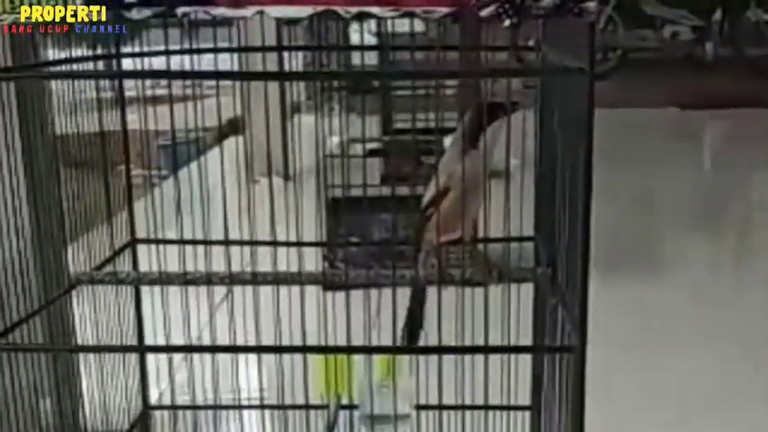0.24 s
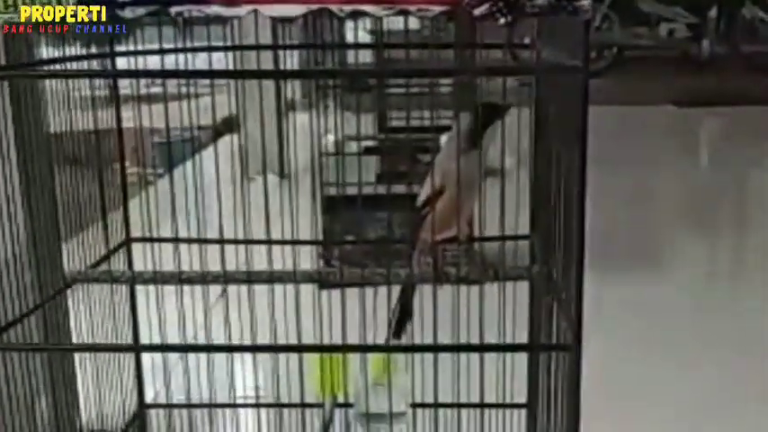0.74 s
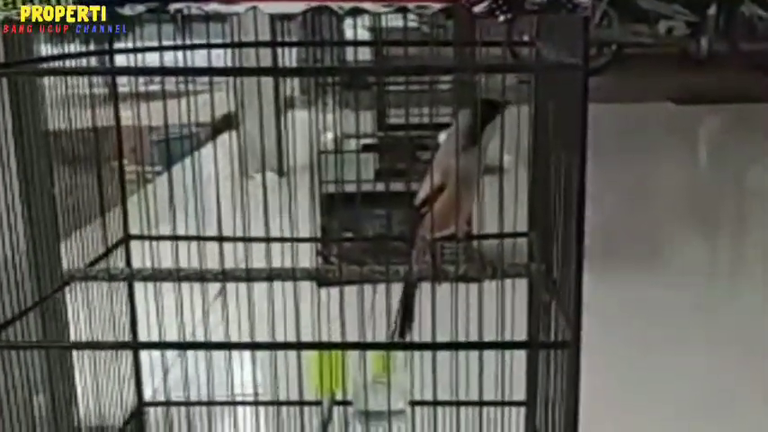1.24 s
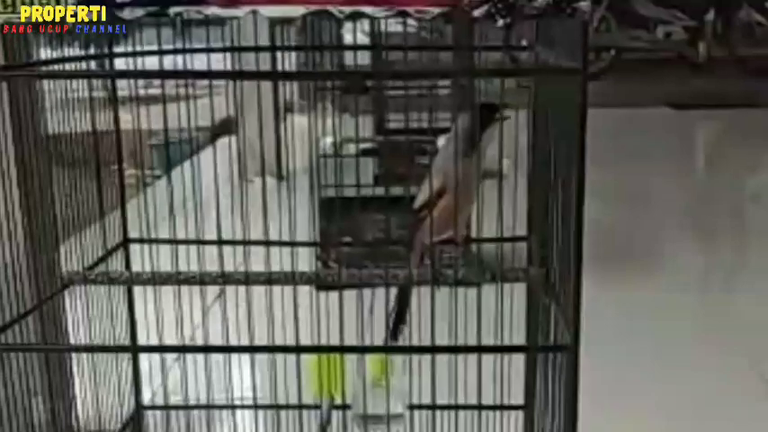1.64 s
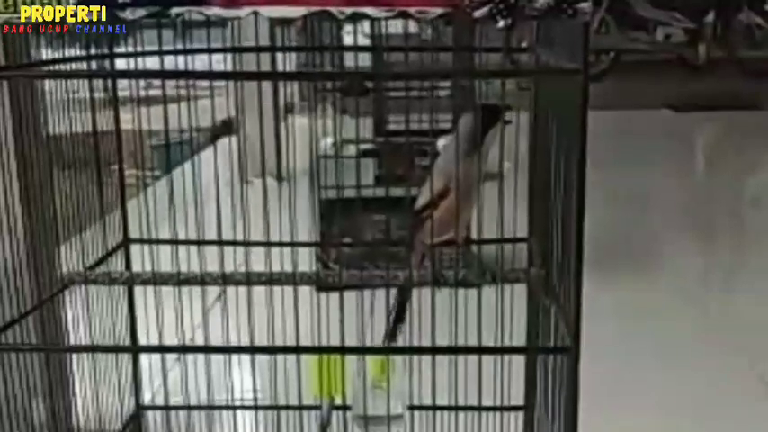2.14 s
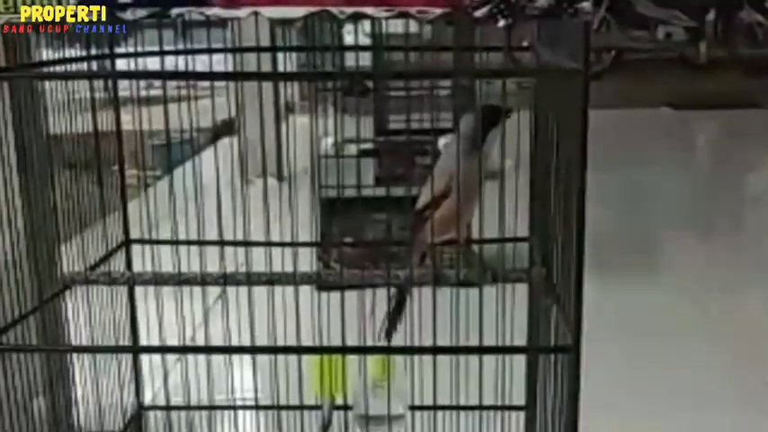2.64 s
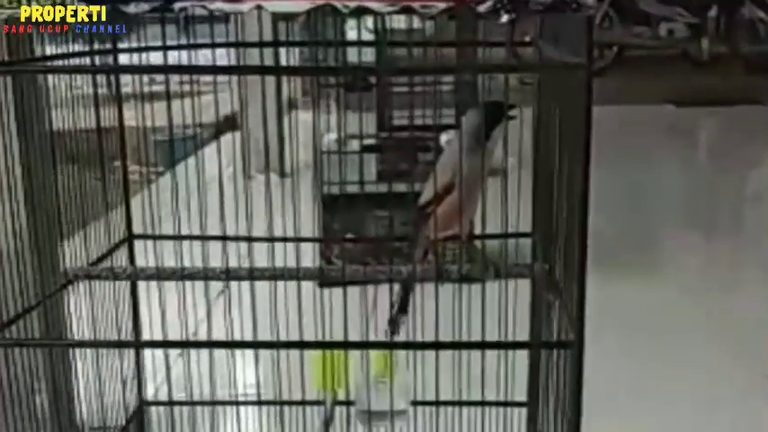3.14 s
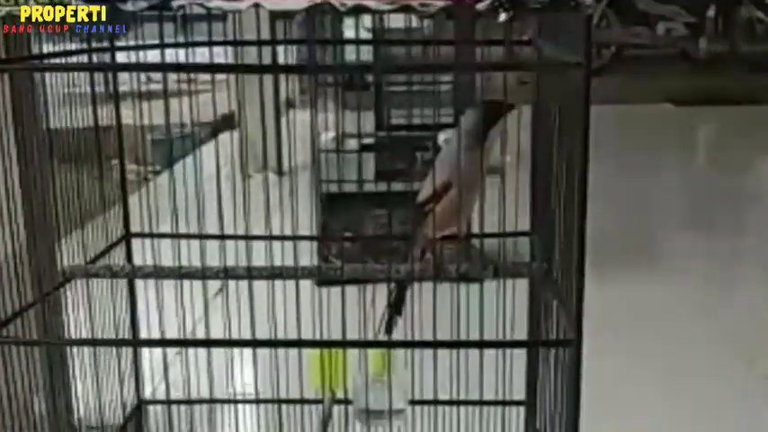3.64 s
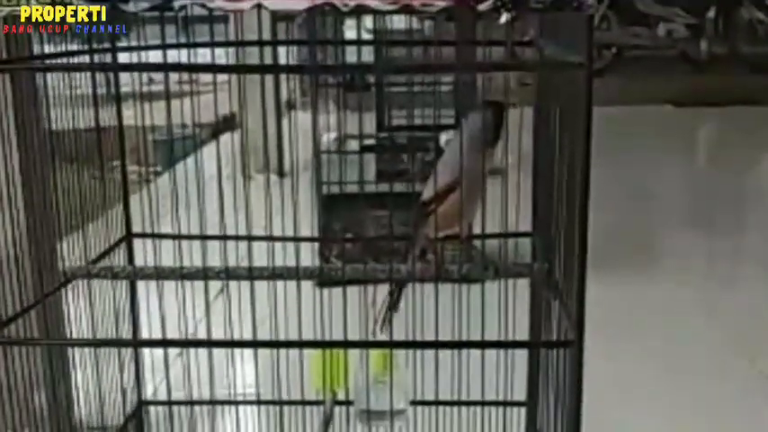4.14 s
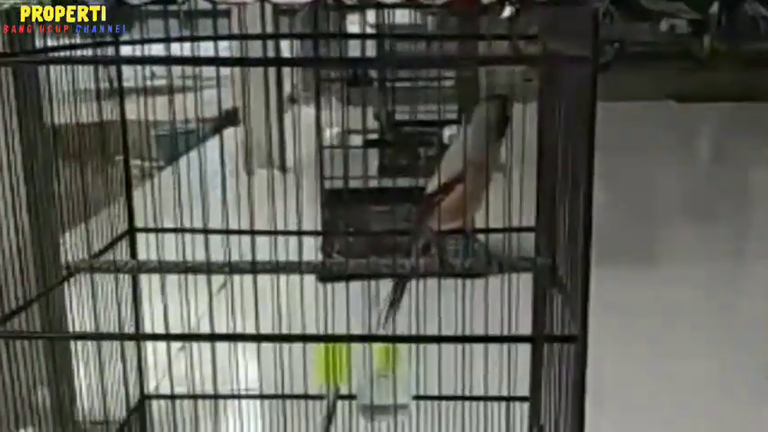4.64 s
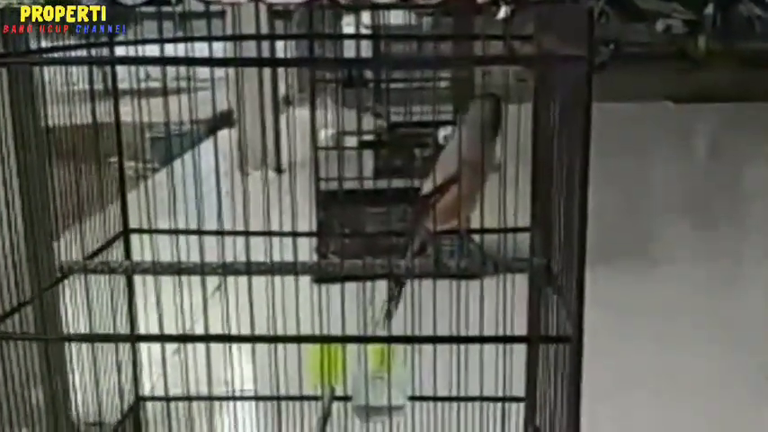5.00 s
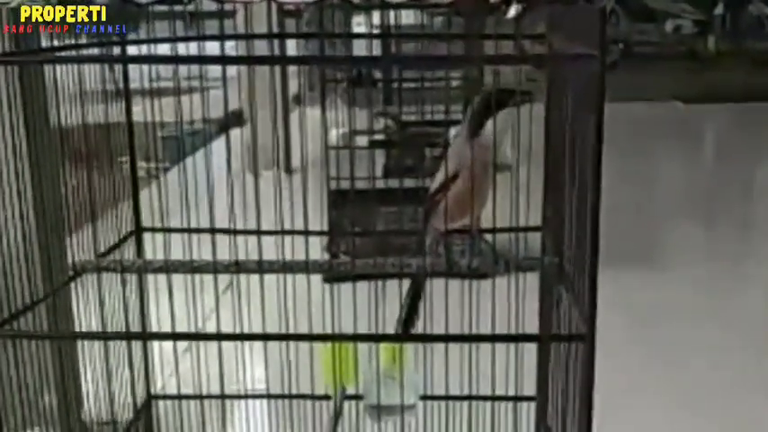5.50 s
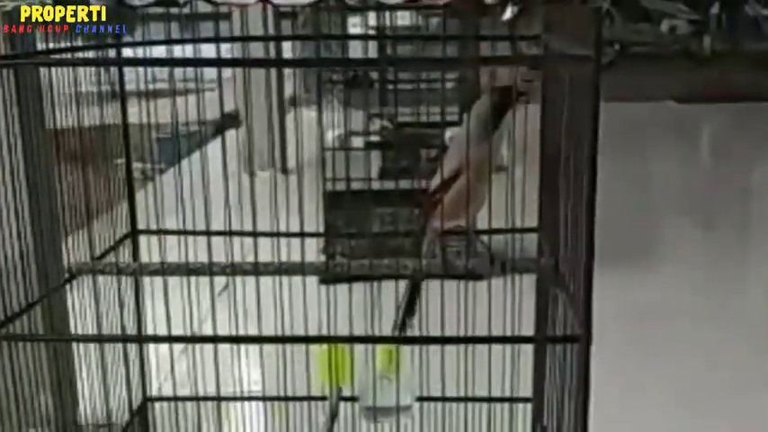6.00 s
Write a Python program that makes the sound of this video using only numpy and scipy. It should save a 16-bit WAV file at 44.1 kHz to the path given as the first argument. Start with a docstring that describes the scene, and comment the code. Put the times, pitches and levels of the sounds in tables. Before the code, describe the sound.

A caged shrike calls close by on a hard-walled porch, bright and forceful, with short diffuse stereo echoes. From 0 to 0.75 seconds it gives six harsh chacks, about seven a second. A short rasp at 0.9 leads into three rising sweeps until 1.35, then eleven quick upward chirps, evenly spaced, until 2.8. Around 3.05 come two brief lower held notes, a small rasp at 3.2, and sharp upward chips at 3.4 and 3.6. A thin high whistle with a rasp sounds at 3.85, and another piercing whistle at 4.1. Chacks return from 4.3 to 4.9, three sweeps from 5.1, and quick chirps from 5.5 to the end near 6.2. Very faintly behind: fluttering piping until 3.8, dove coos around 0.7-3 and after 5, a distant cock crowing from 3.2 to 4.4, blurred birdsong, low outdoor rumble and hiss.

```python
"""A caged shrike on a hard-walled porch, in stereo: chacks first, then rising sweeps and a run of rises,
two held notes, two chips and a high whistle among short rasps, then chacks, sweeps and rises again.
Each note is a gliding stack of harmonics from the syrinx, coloured by the throat and smeared by porch echoes.
Far off, fluttering tones make a soft piping, a dove that coos early and late, and a cock that crows between.
Filtered noise underneath gives low outdoor rumble, faint hiss and a blurred band of far birdsong."""
import sys
import numpy as np
from scipy import signal
from scipy.fft import rfft, irfft
from scipy.io import wavfile
from scipy.ndimage import uniform_filter1d

SR = 44100
rng = np.random.default_rng(int(sys.argv[2]) if len(sys.argv) > 2 else 0)


def wav_out(sig):
    """Save sig, one row per channel (or a flat mono array), as 16-bit PCM at SR to the path in sys.argv[1]."""
    wavfile.write(sys.argv[1], SR, np.round(np.clip(np.atleast_2d(sig).T, -1, 1) * 32767).astype(np.int16))


def to_linear_factor(level_db):
    """Convert decibel levels (scalar or array-like) to linear amplitude factors."""
    exponent = np.asarray(level_db, float) / 20
    return 10 ** exponent


N = 276049   # length in samples


def curve(rows, t):
    """Columns of a table, joined by straight lines in time."""
    s, *columns = np.transpose(rows)
    return [np.interp(t, s, c) for c in columns]


def at_hz(points, hz):
    """A spectrum read on a log-frequency axis."""
    table_hz, values = np.transpose(points)
    return np.interp(np.log(hz), np.log(table_hz), values)


def rms_one(x):
    """Scaled to rms 1."""
    return x / np.sqrt(np.mean(x ** 2) + 1e-20)


def wobble(rate_hz, size):
    """Low-passed noise of spread 1."""
    lowpass = signal.butter(2, rate_hz, fs=SR, output="sos")
    noise = signal.sosfilt(lowpass, rng.standard_normal(size + 4000))
    return rms_one(noise[4000:])   # the filter has settled


# Colour of the bird's throat. Each row: frequency in Hz, relative gain in dB.
THROAT = [(1200, -23), (1500, -1), (2000, -4), (2700, 9.5), (3300, 20.5), (4000, 16.5), (4700, 13),
          (5600, 14.5), (6600, 0), (8000, 3.5), (10100, 1), (11500, 10), (13000, 1), (15500, -34)]
FADE_S, RASP_HZ = 0.003, 643   # decay constant after the finish; bandwidth of the rasp
BLOOM = 0.71   # high harmonics open later in the swell


def note(row, path, voice):
    """One syrinx note: harmonics of a gliding pitch through the throat; rasp smears the high ones most."""
    start, level_db, glide, finish, turn_hz, end_hz = row
    opening, bend, finish_bend, dip, rasp_glide, rasp_finish = path
    swell_ms, finish_db, tilt_glide_db, tilt_finish_db, third_db = voice
    t = np.arange(int((glide + finish + 4 * FADE_S) * SR)) / SR

    # the pitch glides to its turn, then on to its end
    settle = (1 - np.clip(t / glide, 0, 1)) ** bend
    late = np.clip((t - glide) / finish, 0, 1)
    bow = (opening - 1) * settle - dip * np.sin(np.pi * late)
    pitch = turn_hz * (1 + bow) + (end_hz - turn_hz) * late ** finish_bend
    phase = 2 * np.pi * np.cumsum(pitch) / SR

    # rasp and harmonic tilt cross over from glide to finish
    change = [.85 * glide, glide + .4 * finish]
    rasp = np.clip(np.interp(t, change, [rasp_glide, rasp_finish]), 0, 1)
    tilt_db = np.interp(t, change, [tilt_glide_db, tilt_finish_db])
    swell = 1 - np.exp(-(1000 * t / swell_ms) ** 2)

    out = 0
    for k in range(1, 12):
        clear = (1 - rasp) ** (k * k)   # jitter of the cycle grows with the harmonic number
        jitter = wobble(RASP_HZ, size=len(t)) + 1j * wobble(RASP_HZ, size=len(t))
        smear = np.sqrt((1 - clear) / 2) * jitter
        gain_db = at_hz(THROAT, k * pitch) + tilt_db * np.log2(k) + third_db * (k == 3)
        gain = to_linear_factor(gain_db) * (k * pitch < 17000)
        harmonic = np.real((np.sqrt(clear) + smear) * np.exp(1j * k * phase))
        out = out + gain * swell ** (BLOOM * (k - 1)) * harmonic
    fade = np.exp(-np.clip(t - glide - finish, 0, None) / FADE_S)
    return to_linear_factor(level_db + finish_db * late) * swell * fade * rms_one(out)


# Harsh chacks. Each row: start in seconds, level in dB.
CHACKS = [(-.018, -20.5), (0.131, -20.5), (0.267, -19.5), (0.417, -20), (.562, -19.5), (.72, -16),
          (4.271, -22), (4.436, -24.5), (4.583, -20), (4.73, -19), (4.88, -19.5)]
# What all chacks share: glide in seconds, finish in seconds, turning pitch in Hz, end pitch in Hz.
CHACK_RULE = (.014, .014, 2610, 3700)
CHACK_SPREAD = .03   # chance change of both pitches, as a share
# Rising sweeps. Each row: start in seconds, level in dB, turning pitch in Hz, end pitch in Hz.
SWEEPS = [(.976, -24, 2105, 2735), (1.131, -25.5, 1920, 2770), (1.283, -21.5, 1883, 2950),
          (5.08, -23, 2025, 2743), (5.228, -23.5, 1964, 2817), (5.38, -21.5, 2043, 3067)]
SWEEP_GLIDE_S, SWEEP_FINISH_S = .03, .032
# Quick rises. Each row: start in seconds, level in dB, glide in seconds, turning pitch in Hz, end pitch in Hz.
RISES = [(1.429, -21.5, 0.042, 1894, 2607), (1.543, -21, .035, 1858, 2420), (1.665, -20, 0.04, 1758, 2428),
         (1.799, -21.5, .03, 1720, 2400), (1.919, -19.5, 0.033, 1733, 2323),
         (2.051, -20.5, 0.042, 1802, 2436), (2.193, -20.5, .034, 1792, 2447),
         (2.326, -22, .023, 1618, 2403), (2.459, -21, .028, 1706, 2400), (2.61, -20.5, .027, 1774, 2445),
         (2.769, -20, .028, 1770, 2431), (5.507, -22, .039, 1870, 2536), (5.629, -20, 0.03, 1757, 2333),
         (5.749, -20, .028, 1730, 2420), (5.875, -21, .027, 1678, 2402), (6.004, -22.5, 0.027, 1727, 2458),
         (6.136, -20, 0.028, 1752, 2500)]
RISE_LENGTH_S = 0.05   # glide and finish share one breath
# Held notes, rasps, chips and whistle. Each row: start in seconds, level in dB, glide in seconds,
# finish in seconds, turning pitch in Hz, end pitch in Hz.
HELD = [(3.044, -16, 0.0137, 0.029, 1630, 1533), (3.122, -15.5, 0.0219, 0.032, 1571, 1624)]
RASPS = [(.918, -23.5, 0.019, 0.075, 2283, 1867), (3.19, -22, 0.016, 0.019, 1502, 1620),
         (3.245, -45, 0.0078, 0.016, 1580, 1484), (3.842, -20.5, 0.0055, 0.0097, 1892, 1802),
         (3.862, -15, 0.0013, 0.006, 1932, 1864)]
CHIPS = [(3.371, -17, 0.013, .018, 2350, 3060), (3.583, -15, 0.011, 0.018, 2384, 3270)]
WHISTLES = [(3.841, -16, 0.016, 0.0013, 5880, 5000), (4.091, -21.5, 0.0132, 0.0047, 6060, 6000),
            (4.112, -13, 0.0037, 0.017, 6310, 6530)]
# Pitch path of each kind. The row: starting over turning pitch, bend (exponent) of the glide,
# bend of the finish, dip in the finish as a share of turning pitch, rasp 0-1 in glide, rasp 0-1 in finish.
CHACK_PATH = (1.25, 2.2, 3.0, .24, .02, .08)
SWEEP_PATH = (.76, 3.5, .5, 0, .012, .01)
RISE_PATH = (.84, 1.2, .45, 0, .01, .05)
HELD_PATH = (.75, 2.5, 1.0, 0, .03, .012)
RASP_PATH = (.92, 2.0, 1.0, 0, .18, .16)
CHIP_PATH = (.78, 2.0, 5.0, 0, .015, .07)
WHISTLE_PATH = (1.15, 1.5, .5, 0, .025, .02)
# Voice of each kind. The row: swell in ms, level change over the finish in dB, harmonic tilt in glide
# in dB per octave, tilt in finish in dB per octave, extra gain of the third harmonic in dB.
CHACK_VOICE = (8.5, -4.5, 1, 4.5, -2)
SWEEP_VOICE = (4.5, -1, -2, -48, -13.5)
RISE_VOICE = (3, 2.5, -3.5, 2.5, -3)
HELD_VOICE = (2.5, -15.5, -4.5, 0.5, -4.5)
RASP_VOICE = (0.5, -8.5, 4, 6.5, 3.5)
CHIP_VOICE = (4.5, -3.5, 3.5, 4.5, 1)
WHISTLE_VOICE = (6.5, -15, 1, -22, 0)
LOWEST_HZ = 1350   # high-pass: the small bird's voice lies above


def shrike():
    """All syrinx notes at their moments, dry, after one second of lead-in."""
    chacks = []
    glide, finish, *pitches = CHACK_RULE
    for s, db in CHACKS:
        vary = 1 + CHACK_SPREAD * rng.standard_normal(2)
        chacks.append((s, db, glide, finish, *(pitches * vary)))
    sweeps = [(s, db, SWEEP_GLIDE_S, SWEEP_FINISH_S, turn, end) for s, db, turn, end in SWEEPS]
    rises = []
    for s, db, glide, turn, end in RISES:
        rises.append((s, db, glide, max(RISE_LENGTH_S - glide, FADE_S), turn, end))
    kinds = ((chacks, CHACK_PATH, CHACK_VOICE), (sweeps, SWEEP_PATH, SWEEP_VOICE),
             (rises, RISE_PATH, RISE_VOICE), (HELD, HELD_PATH, HELD_VOICE),
             (RASPS, RASP_PATH, RASP_VOICE), (CHIPS, CHIP_PATH, CHIP_VOICE),
             (WHISTLES, WHISTLE_PATH, WHISTLE_VOICE))
    out, lead = np.zeros(N + 2 * SR), SR
    for rows, path, voice in kinds:
        for row in rows:
            sound = note(row, path, voice)
            at = lead + round(row[0] * SR)
            out[at:at + len(sound)] += sound
    highpass = signal.butter(8, LOWEST_HZ, "high", fs=SR, output="sos")
    return signal.sosfilt(highpass, out[:lead + N])


# Reverberation of the porch walls. Each row: frequency in Hz, time to fall 60 dB in seconds.
PORCH_T60 = [(1500, 0.3), (3500, 0.23), (7000, 0.34), (13000, 0.2)]
PORCH_DB, PORCH_SHARED = -1.5, 0.051   # echo energy against direct; share alike at both microphones
FIRST_ECHO_S = .006   # time constant of the echo build-up
YARD_DB, YARD_STRETCH = -18, 5.23   # a weaker, longer tail from the walls beyond the porch
LEFT_LAG, LEFT_DB = 6, .9   # the left microphone hears the bird later (samples), at a higher gain


def porch(song):
    """Direct sound plus a dense echo tail dying band by band, partly alike at both microphones."""
    t = np.arange(SR) / SR
    common, *own = rng.standard_normal((3, len(t)))
    dense = np.sqrt(PORCH_SHARED) * common + np.sqrt(1 - PORCH_SHARED) * np.array(own)
    spectrum, hz = rfft(dense), np.fft.rfftfreq(len(t), 1 / SR)
    echoes, edges = 0, np.geomspace(1000, 18000, 9)
    for low, high in zip(edges, edges[1:]):
        band = irfft(spectrum * (hz >= low) * (hz < high), len(t))
        fall_db = -60 * t / at_hz(PORCH_T60, np.sqrt(low * high))
        echoes = echoes + band * np.hypot(to_linear_factor(fall_db), to_linear_factor(YARD_DB + fall_db / YARD_STRETCH))
    echoes = echoes * (1 - np.exp(-(t / FIRST_ECHO_S) ** 2))
    echoes *= to_linear_factor(PORCH_DB) / np.sqrt(np.sum(echoes ** 2, axis=1, keepdims=True))
    echoes[:, 0] = 1   # direct sound
    left, right = signal.fftconvolve(song[None], echoes, axes=1)[:, :len(song)]
    stereo = np.array([to_linear_factor(LEFT_DB) * np.roll(left, LEFT_LAG), right])
    return stereo[:, -N:]   # without the lead-in


def far_call(rows, flutter_db, low_db=-90):
    """A soft tone that flutters with distance, differently at each microphone; low_db: octave below."""
    t = np.arange(N) / SR
    pitch, level_db = curve(rows, t)
    on = uniform_filter1d(1. * (t > rows[0][0]) * (t < rows[-1][0]), size=900)
    phase = 2 * np.pi * np.cumsum(pitch) / SR + 0.63 * wobble(38, size=N)
    octave_below = to_linear_factor(low_db) * np.sin(phase / 2)
    turns = (0, .8 * wobble(12, size=N))   # wandering phase between the microphones, radians
    tone = np.array([np.sin(phase + turn) + octave_below for turn in turns])
    flutter = to_linear_factor(flutter_db * np.array([wobble(34, size=N), wobble(30, size=N)]))
    return np.sqrt(2) * to_linear_factor(level_db) * on * flutter * tone


def arches(calls, shape):
    """Each call swells to its top, then sags and dies: rows of start s, pitch Hz, level dB."""
    top, start_ratio, end_ratio, start_db, end_db, release = shape
    silent_db = -95
    rows = []
    for s, length, db, hz in calls:
        start_hz, end_hz = start_ratio * hz, end_ratio * hz
        rows += [(s - release / 2, start_hz, silent_db),
                 (s, start_hz, db + start_db),
                 (s + top * length, hz, db),
                 (s + length, end_hz, db + end_db),
                 (s + length + release, end_hz, silent_db)]
    return sorted(rows)


# Far coos. Each row: start in seconds, length in seconds, level in dB, top pitch in Hz.
DOVE = [(.73, 0.12, -60, 645), (1.05, .24, -51, 725), (1.47, 0.45, -55, 665), (2.41, .16, -61.5, 605),
        (2.95, 0.098, -63, 660), (4.97, 0.11, -63, 645), (5.29, .3, -52, 725), (5.74, 0.41, -54.5, 665)]
# Arch of a coo. The row: share of its length to the top, start over top pitch, end over top pitch,
# start in dB against the top, end in dB against the top, release in seconds.
DOVE_SHAPE = (.35, .92, .91, -7, -6, .06)


def dove():
    """Far coos: fluttering sine tones that climb and sag."""
    return far_call(arches(DOVE, DOVE_SHAPE), flutter_db=5.5)


# Far crow syllables. Each row: start in seconds, length in seconds, level in dB, top pitch in Hz.
COCK = [(3.24, 0.49, -56.5, 1653), (3.92, .5, -55, 1590)]
# Arch of a syllable. The row: share of its length to the top, start over top pitch, end over top pitch,
# start in dB against the top, end in dB against the top, release in seconds.
COCK_SHAPE = (.2, 1.02, .95, -4, -8, .05)


def cock():
    """Far crowing: sagging fluttering tones with a partial an octave below."""
    return far_call(arches(COCK, COCK_SHAPE), flutter_db=5.0, low_db=-9)


# Far soft pipes. Each row: start in seconds, length in seconds, level in dB.
PIPING = [(0.52, 0.081, -64), (0.902, 0.046, -59), (1.011, 0.093, -59), (1.19, 0.12, -58.5),
          (1.42, 0.075, -59), (1.709, 0.051, -58), (1.976, 0.054, -57), (2.185, 0.16, -60),
          (2.416, 0.13, -57), (2.702, 0.082, -54), (2.871, 0.036, -51), (2.928, 0.13, -56),
          (3.11, 0.18, -53), (3.467, 0.32, -55)]
# Arch of a pipe. The row: share of its length to the top, start over top pitch, end over top pitch,
# start in dB against the top, end in dB against the top, release in seconds.
PIPING_SHAPE = (.3, .99, .99, -4, -4, .06)
PIPING_HZ = 1099   # top pitch


def piping():
    """A far soft tone piping at nearly one pitch."""
    calls = [(*row, PIPING_HZ) for row in PIPING]
    return far_call(arches(calls, PIPING_SHAPE), flutter_db=3.5)


def twitter():
    """Far birdsong blurred by distance into a faint wavering band of noise."""
    bandpass = signal.butter(3, (2100, 4200), "band", fs=SR, output="sos")
    band = signal.sosfilt(bandpass, rng.standard_normal((2, N)))
    return to_linear_factor(-57 + 4.0 * wobble(9, size=N)) * rms_one(band)


# Spectrum of the outdoor rumble. Each row: frequency in Hz, relative density in dB per Hz.
AIR = [(15, -45), (25, -0.5), (83, 1), (139, -7.5), (231, -17), (287, -16.5), (370, -21.5), (476, -23),
       (634, -17.5), (845, -23.5), (1180, -20.5), (1310, -29), (1400, -31.5), (1820, -12.5), (3080, -120)]
# Level of the rumble. Each row: time in seconds, level in dB.
AIR_DB = [(0.0, -51.5), (0.7, -50.5), (0.78, -50), (3.78, -49), (4.97, -53.5), (6.24, -46.5), (6.26, -53)]
# Likeness of the rumble at the two microphones. Each row: frequency in Hz, correlation (1 is identical).
LIKENESS = [(60, 0.93), (180, 0.96), (550, 0.49), (1650, 0.33), (4970, 1), (15000, 0.02)]
HISS_DB, HISS_TOP_HZ = -66, 12500   # level before the low-pass; its corner


def air():
    """Outdoor rumble as shaped noise, alike at both microphones in the bass, and a faint hiss."""
    hz = np.maximum(np.fft.rfftfreq(N, 1 / SR), 10)
    mid, side = rfft(rng.standard_normal((2, N))) * to_linear_factor(at_hz(AIR, hz))
    alike = np.clip(at_hz(LIKENESS, hz), -1, 1)
    opposite = np.array([[1], [-1]])
    rumble = irfft(np.sqrt(1 + alike) * mid + np.sqrt(1 - alike) * side * opposite, N)
    level_db, = curve(AIR_DB, np.arange(N) / SR)
    lowpass = signal.butter(6, HISS_TOP_HZ, fs=SR, output="sos")
    hiss = signal.sosfilt(lowpass, rng.standard_normal((2, N)))
    return to_linear_factor(level_db) * rms_one(rumble) + to_linear_factor(HISS_DB) * hiss


def scene():
    """The shrike on the porch, far birds, air."""
    return porch(shrike()) + dove() + cock() + piping() + twitter() + air()


def roll_off(x):
    """The treble ends steeply here."""
    return signal.sosfilt(signal.butter(12, 16260, fs=SR, output="sos"), x)


def record(dry):
    """The extreme treble is cut steeply: 70 dB down from 16500 Hz."""
    lowpass = signal.cheby2(12, 70, 16500, fs=SR, output="sos")
    mix = signal.sosfilt(lowpass, dry)
    return roll_off(mix)


dry = scene()
out = record(dry)
wav_out(out)
```